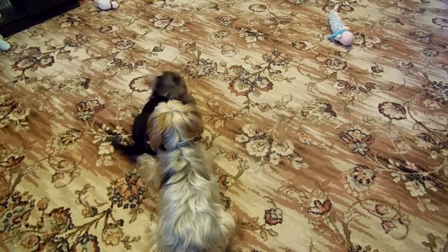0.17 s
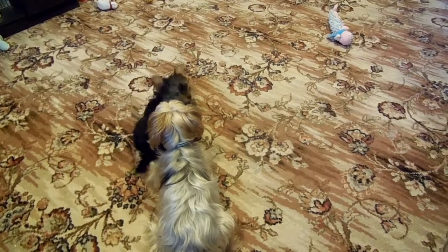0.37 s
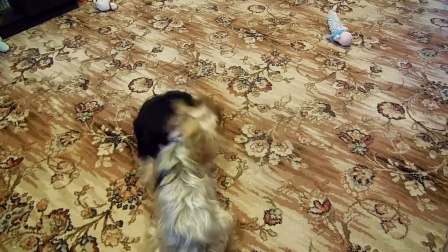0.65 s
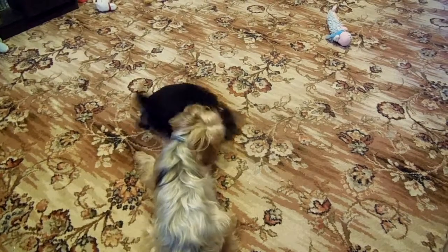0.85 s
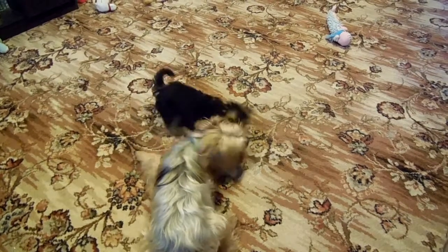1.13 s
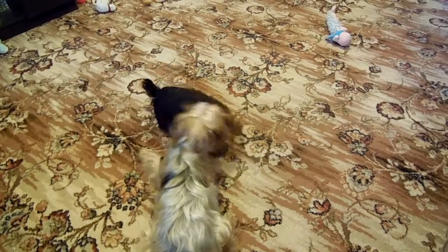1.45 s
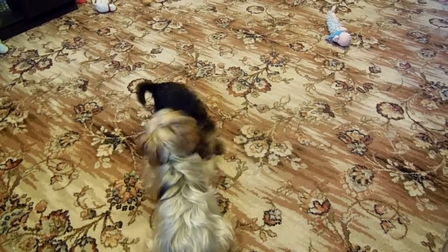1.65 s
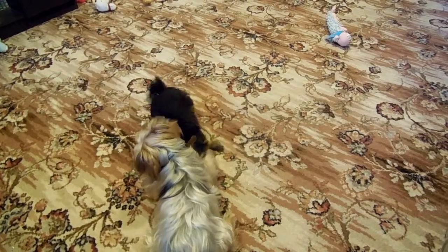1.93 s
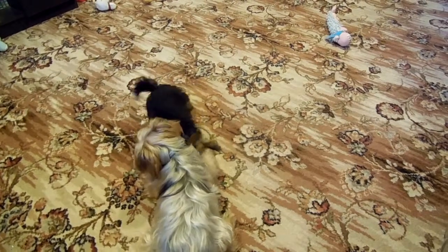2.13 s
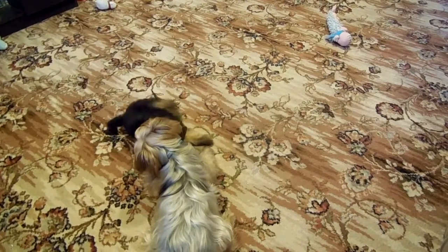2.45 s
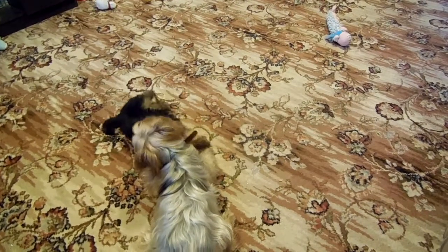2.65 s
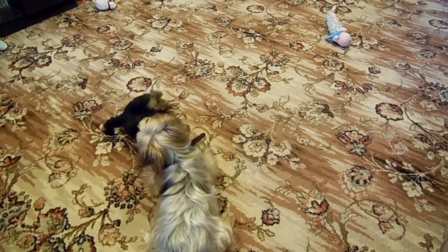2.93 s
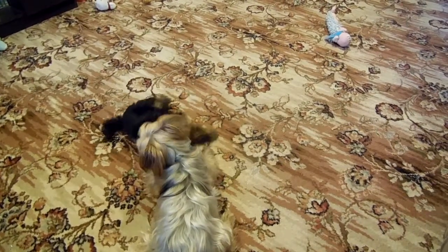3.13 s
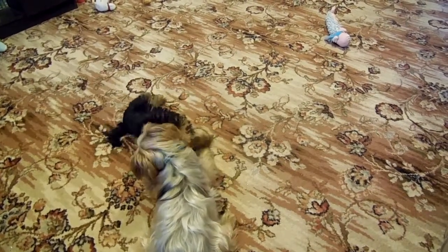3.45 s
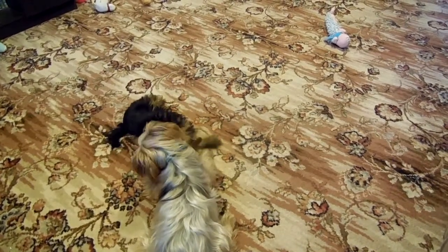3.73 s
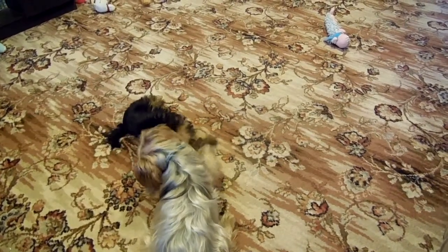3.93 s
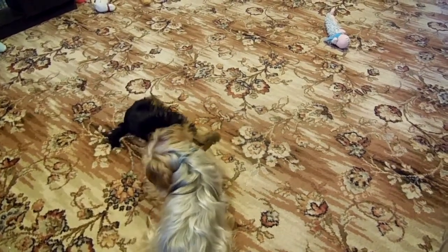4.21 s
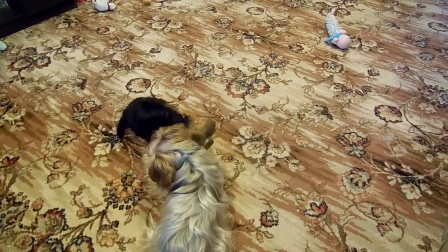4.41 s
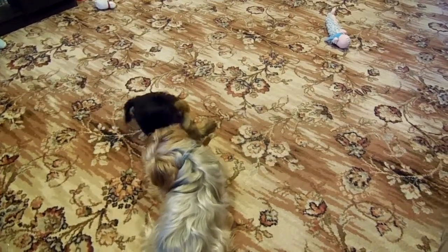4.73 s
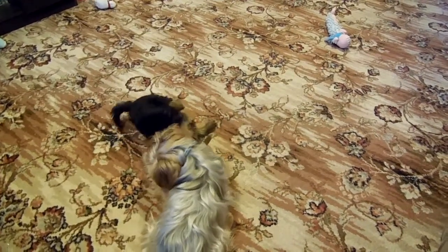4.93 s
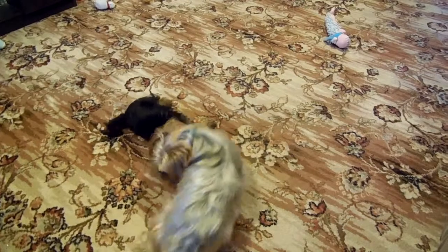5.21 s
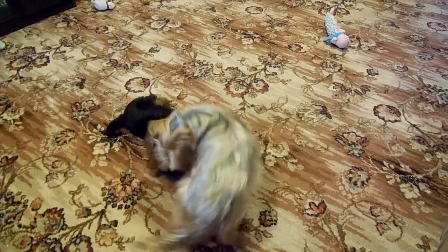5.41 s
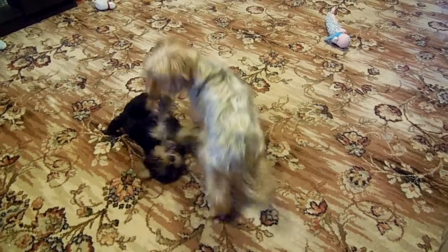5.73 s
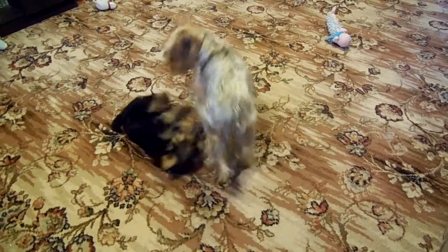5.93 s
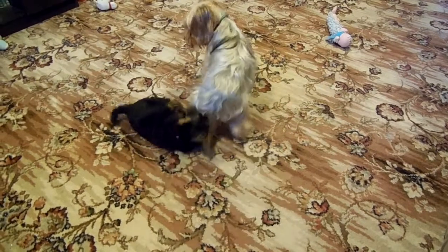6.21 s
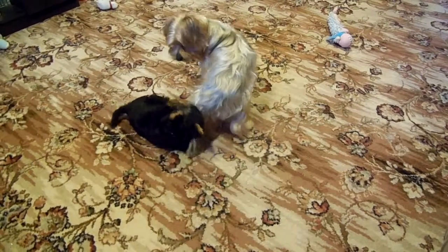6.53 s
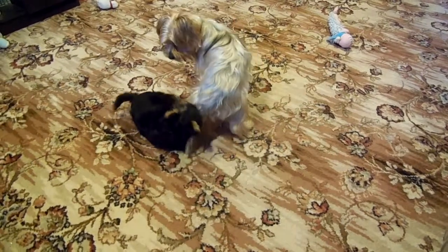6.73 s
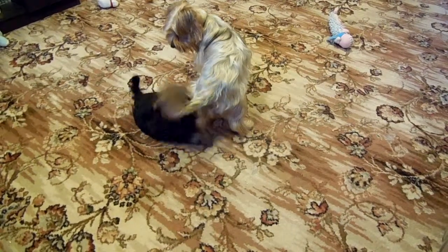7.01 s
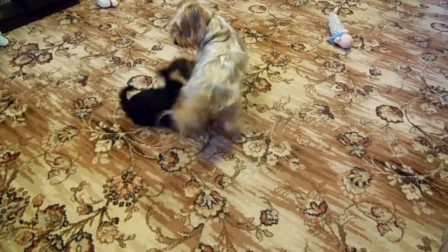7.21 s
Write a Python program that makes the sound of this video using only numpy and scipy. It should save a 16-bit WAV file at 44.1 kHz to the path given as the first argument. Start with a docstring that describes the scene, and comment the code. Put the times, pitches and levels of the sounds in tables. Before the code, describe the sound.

Two puppies scuffle softly in a quiet room, a collar tag clinking on and off amid a few claw clicks and a tiny squeak.

```python
"""Two puppies tussle on a carpet in a quiet room, a couple of metres from a stereo microphone.
Over room noise, mains hum and microphone hiss, fur rustles and a metal collar tag is struck and rattles
on its ring. Claws and teeth click at one second; at a second and a half one pup squeaks. After a lull
the tag starts again at three seconds, takes a hard blow just after four amid more clicks, then jingles
on in mostly lighter bursts. The furnished room answers with a short, dull echo."""
import sys
import numpy as np
from scipy import signal
from scipy.fft import rfft, irfft, next_fast_len
from scipy.io import wavfile
from scipy.ndimage import uniform_filter1d

SR = 44100
rng = np.random.default_rng(int(sys.argv[2]) if len(sys.argv) > 2 else 0)


def log_audio(samples):
    """Write samples as a 16-bit WAV file to the path given in sys.argv[1]."""
    # one column per channel
    frames = np.atleast_2d(samples).T
    # limit to full scale, then quantise
    limited = np.clip(frames, -1, 1)
    pcm = np.round(limited * 32767).astype(np.int16)
    wavfile.write(sys.argv[1], SR, pcm)


N = 324311
FFT = next_fast_len(N)

# Modes of the tag in five groups, by the way it is hit: main ring, clack, edge, upper rings 1 and 2.
# Each row of a group: nominal pitch in Hz, relative level in dB, nominal 60 dB decay time in seconds.
TAG_MODES = [
    [(4090, 0, 0.059), (4160, -18, 0.05), (4260, -19, 0.03)],
    [(4350, -9, 0.014), (4560, -7.5, 0.014), (4880, -7, 0.014), (5220, -12, 0.011), (5530, -20, 0.0082)],
    [(6610, 1, 0.024), (7480, -7.5, 0.027), (8740, -12, 0.02)],
    [(9995, 3, 0.085), (13400, -9, 0.045)],
    [(11000, 7, 0.059), (15250, -10, 0.07)],
]
# Blows on the tag. Each row: start in seconds, main ring level in dB, then clack, edge and upper rings
# in dB against it, freedom to ring from 0 to 1.
TAG_BLOWS = [(0.1847, -36.5, -17, -20, -13, 0.3), (0.205, -36.5, -19, -22, -25, 1),
             (0.283, -43, 3, 3, -21, 1), (0.302, -34, -14, -14, -23, 0.8), (0.3195, -33, -20, -26, -34, 1),
             (0.333, -42, -16, -24, -26, 0.3), (0.7847, -44, -15, -13, -19, 0.5),
             (0.837, -36.5, -14, -11, -11, 0.15), (0.927, -44, -13, 7, 3.5, 0.22),
             (0.945, -43.5, -10, 4, -12, 0.64), (1.024, -32, -22, -27, -40, 1),
             (1.053, -28, -28, -26, -28, 0.15), (1.071, -26, -20, -24, -28, 0.14),
             (1.0926, -37, 2, -14, -22, 1), (1.117, -27.5, -6, -8, -39, 1),
             (1.15, -23.5, -16, -34, -42, 0.42), (1.188, -36, -11, -24, -20, 1),
             (1.45, -39.5, -14, -21, -30, 0.6), (1.498, -44, -10, -13, -19, .8),
             (1.53, -39, -15, -3, -26, 0.4), (1.655, -49, 7.5, -9, -11, 0.5),
             (1.7138, -21.5, 0, -16.5, -19.5, 0.77), (1.7788, -33.5, -20, -19, -18, 0.6),
             (1.8186, -39, -13, -13, -31, 0.7), (1.871, -50.5, -1, 17.5, -3, 0.6),
             (1.883, -57, -1, 20, -1, 0.5), (1.899, -40, -2, 15, -5, 0.4), (1.92, -37, -16, -7, -27, 0.8),
             (1.939, -31.5, -5, -17, -28, 0.8), (1.985, -29.5, -14, 3, -24, 0.45),
             (2.037, -44, -4, -16, -11, 0.6), (2.0986, -39, 1, -20, -11, 0.9),
             (2.156, -42, -8, -13, -11, 0.83), (2.2266, -42, -4, -11, -7, 1),
             (3.1257, -35.5, -11, -2, -25, 0.27), (3.146, -41, -12, -16, -25, 0.4),
             (3.242, -40, -6, -17, -25, 0.4), (3.267, -45, 5, -12, -18, 0.4),
             (3.286, -39, -0.5, -13, -21, 0.4), (3.3776, -20.5, -8, -10, -25, 0.2),
             (3.434, -28, -1, -2, -20, 0.34), (3.5693, -26.5, -5, -26, -32, 1),
             (3.592, -30.5, -7, -26, -35, 0.3), (3.609, -41.5, 9.5, -12, -21, 1),
             (3.693, -32, -19, -19, -13, 0.2), (3.75, -47, 1, -5, -7, 0.7), (3.77, -44, -10, -10, -7, 0.58),
             (4.3068, -19, -15, -24, -27, 0.19), (4.3165, -33, -8, -24, -22, .15),
             (4.3217, -35, -3, -24, -24, 0.2), (4.33, -41, -6, -22, -22, .2),
             (4.872, -45.5, -15, -10, -10, 0.33), (4.924, -49, -8, -14, -17, 0.6),
             (5.058, -45, -8, -12, -8, 0.17), (5.075, -48.5, -9, 11.5, -11, 0.55),
             (5.095, -40, -9, -16, -14, 0.14), (5.13, -40, -13, -16, -13, 0.27),
             (5.234, -43, -8, -12, -24, 0.4), (5.303, -48, -10, -14, -11, 0.46),
             (5.326, -51, -12, -14, -14, .3), (5.424, -47.5, -14, -14, -16, 0.48),
             (5.5627, -26, -18, -25, -36, 0.18), (5.9844, -52, 10, -4, -2, .5),
             (6.0386, -43, 0, -8, -19, 0.6), (6.0656, -52.5, 3, 14, 8, 0.9),
             (6.098, -34, 4.5, -19, -14, 0.96), (6.229, -37, -7, -19, -29, 0.5),
             (6.2432, -34, -7, -20, -30, 0.33), (6.2903, -39.5, -5, -9, -13, 0.2),
             (6.364, -42, -13, -12, -14, 0.4), (6.383, -40, -14, -16, -14, 0.35),
             (6.437, -48, -5, -6, 2, 0.2), (6.49, -44.5, -11, -5, -14, 0.9),
             (6.5302, -45, -18, -13, -15, 0.6), (7.152, -46, -7, -15, -21, .8),
             (7.16, -37, -14, -20, -22, 0.3), (7.1817, -34.5, 0, -26, -24, 0.44),
             (7.197, -49, -6, -20, -20, .25), (7.214, -42, 1, -17, -17, 0.25),
             (7.255, -40, -4, -17, -16, 0.12), (7.285, -44, -1, -15, -22, 0.05),
             (7.312, -48, -8, -17, -20, .2)]
TOPMOST_HZ = 12000  # modes above this swell and sink with the way the tag hangs


def undb(db):
    """Turn dB into gain."""
    return np.exp(np.asarray(db) * (np.log(10) / 20))


def level(x, db):
    """Scale to an rms level."""
    return x * undb(db) / np.sqrt(np.mean(x ** 2))


def fade(t, t60):
    """Decay by 60 dB in t60 seconds."""
    return np.exp(-np.log(1000) * t / t60)


def curve(rows, rest):
    """Columns of a timed table joined by straight lines, at a rest value outside it."""
    times, *columns = np.transpose(rows)
    return np.array([np.interp(np.arange(N) / SR, times, column, rest, rest) for column in columns])


def sides(pan_db):
    """Left and right gains, pan_db being left minus right."""
    return undb(np.array([pan_db, -pan_db]).reshape(2, -1) / 2)


def add(out, start, sound):
    """Mix a short sound in at start seconds."""
    i = int(start * SR)
    out[:, i:i + sound.shape[1]] += sound[:, :N - i]


def walk(rate):
    """Random values joined by straight lines, rate new ones a second; spread near 1."""
    knots = rng.standard_normal(int(N / SR * 100) + 2)
    return 1.2 * np.interp(np.arange(N) * rate / SR, np.arange(len(knots)), knots)


def on_log_hz(table):
    """Spread rows of frequency and value over every frequency bin."""
    hz, value = np.transpose(table)
    return np.interp(np.log(np.arange(FFT // 2 + 1) * SR / FFT + 1), np.log(hz), value)


def room_tone(noise_db=-52, pan_db=-1):
    """Steady room noise and microphone hiss, alike on both sides in the bass, with wavering mains hum."""
    # Broad noise whose highest treble falls away. Each row: frequency in Hz, relative density in dB.
    spectrum = [(15, -54), (28, -7.5), (53, -11), (92, -8.5), (138, -7), (244, -3), (481, -3), (1000, -2),
                (4330, -8), (10000, -14), (13500, -21), (14200, -28), (15200, -29), (16500, -56)]
    # Likeness of the two channels. Each row: frequency in Hz, left-right correlation.
    likeness = [(25, .97), (60, 1), (125, 0.37), (250, 0.57), (500, 0.11), (16000, 0.093)]
    # Tones of the hum. Each row: frequency in Hz, level in dB.
    hum_tones = [(50, -74), (200, -78), (250.5, -69.5), (301, -78.5), (390, -76.5), (732, -76)]
    alike = np.clip(on_log_hz(likeness), 0, 1)
    coloured = rfft(rng.standard_normal((2, FFT))) * undb(on_log_hz(spectrum))
    mid, side = coloured * np.sqrt([1 + alike, 1 - alike])
    noise = level(irfft(np.array([mid + side, mid - side]), FFT)[:, :N], noise_db)
    t = np.arange(N) / SR
    hum = sum(np.sqrt(2) * undb(db + 0.85 * walk(8)) * np.sin(2 * np.pi * hz * t + 0.47 * walk(8.8))
              for hz, db in hum_tones)
    return (noise + hum) * sides(pan_db)


def room_echo(near, t60=0.16, echo_db=-4.5, carpet_hz=7000, pan_db=-3):
    """Carpet and furniture leave a short, dense, dull tail, different on each side of the microphone."""
    t = np.arange(SR // 2) / SR
    tail = rng.standard_normal((2, len(t))) * fade(t, t60) * (t > .0015)
    tail = signal.lfilter(*signal.butter(2, carpet_hz, fs=SR), tail)
    tail = tail * undb(echo_db) / np.sqrt(np.sum(tail ** 2, axis=1, keepdims=True))
    return signal.oaconvolve(near.mean(axis=0, keepdims=True), tail, axes=1)[:, :N] * sides(pan_db)


def fur_rustle(gain_db=4):
    """Fur and paws brush the carpet: grainy noise that follows the movement."""
    # Strength of the brushing. Each row: time in seconds, relative level in dB.
    movement = [(0.0, -62.5), (0.3, -54), (0.61, -67.5), (0.92, -54.5), (1.3, -56), (1.42, -56), (1.9, -55),
                (2.03, -51), (2.11, -56.5), (3.03, -65), (3.46, -54.5), (3.62, -57.5), (4.05, -66.5),
                (4.3, -61), (5.94, -58.5), (6.04, -52), (6.2, -60.5), (6.37, -51.5), (6.51, -61),
                (7.04, -64.5), (7.25, -56), (7.35, -70)]
    # Broad soft hiss of the brushing; the top rows are a treble cutoff near 14 kHz, not the fur.
    # Each row: frequency in Hz, relative density in dB.
    spectrum = [(100, -47), (300, -4.5), (1000, -5), (2500, -3.5), (6000, -10.5), (13500, -12),
                (14300, -56), (16500, -42)]
    grains = rng.standard_normal((2, N)) * undb(walk(60) + .5 * walk(38) + curve(movement, -89))
    bin_gains = level(undb(on_log_hz(spectrum)), 0)
    return undb(gain_db) * irfft(rfft(grains, FFT) * bin_gains, FFT)[:, :N]


def pup_squeak(creak_hz=192.5, roughness=1.25, mouth_hz=2480, mouth_db=-3, pan_db=-2):
    """Creaky pulses in a rising throat resonance and a steady mouth one merge into a thin whistle."""
    # Course of the squeak. Each row: time in seconds, throat resonance in Hz, level in dB,
    # share of creaky pulses from 0 to 1.
    contour = [(1.445, 2345, -62, .4), (1.455, 2500, -47, .4), (1.462, 2640, -41, .9),
               (1.474, 2820, -41, .7), (1.48, 2910, -39, .3), (1.489, 2910, -45, .4),
               (1.499, 2910, -42, .2), (1.509, 2910, -48, .3), (1.514, 2900, -62, .2),
               (1.521, 2900, -52, .2), (1.53, 2915, -57, .2), (1.56, 2920, -57, .2), (1.595, 2920, -66, .1)]
    hz, db, creak = curve(contour, -200)
    creak = np.clip(creak, 0, 1)
    pulse_hz = creak_hz * (1 + 0.13 * walk(90))
    pulses = 2.8 * np.sin(np.pi * np.cumsum(pulse_hz) / SR) ** 4
    hoarse = 1 + roughness * uniform_filter1d(rng.standard_normal((2, N)), size=40)
    throat = (1 - creak + creak * pulses) * np.sin(2 * np.pi * np.cumsum(hz) / SR)
    mouth = undb(mouth_db) * creak * (.5 + .5 * pulses) * np.sin(2 * np.pi * mouth_hz * np.arange(N) / SR)
    return np.sqrt(2) * undb(db) * (hoarse[0] * throat + hoarse[1] * mouth) * sides(pan_db)


def claws_and_teeth(contact_s=0.00015, tick_db=9.5, knock_hz=800, scuff_db=-19):
    """Hard contacts give dry ticks of a cycle or two over a dull knock and a short scuff."""
    # Clicks of claws and teeth. Each row: start in seconds, level in dB, pitch in Hz,
    # left minus right in dB, relative level of the knock in dB.
    clicks = [(0.988, -32, 1810, -3.5, -20), (1.005, -35, 2100, -3, -4.5), (1.39, -35, 2600, -2.5, -30),
              (4.158, -40, 3530, 0, -4), (4.1787, -43.5, 2640, -1, 4.5), (4.181, -40, 1580, -5, -22),
              (4.558, -39, 2160, -10, -7), (4.567, -59, 2200, -5, -8), (4.593, -57, 1200, -3, 10),
              (4.61, -60, 1200, -1, 8), (5.897, -43.5, 3300, -1.5, -10), (5.977, -48, 2540, 0, -10)]
    out, t = np.zeros((2, N)), np.arange(SR // 20) / SR
    envelope = (1 - np.exp(-t / contact_s)) * fade(t, t60=0.0032)
    knock = np.sin(2 * np.pi * knock_hz * t) * fade(t, t60=0.012)
    soft_noise = 2 * uniform_filter1d(rng.standard_normal((len(clicks), len(t))), size=5)
    scuffs = soft_noise * undb(scuff_db) * fade(t, t60=0.1)
    scuffs = signal.lfilter(*signal.butter(2, 250, "high", fs=SR), scuffs)
    for (start, db, hz, pan_db, knock_db), scuff in zip(clicks, scuffs):
        tick = undb(tick_db) * np.sin(2 * np.pi * hz * t) * envelope
        add(out, start, undb(db) * (tick + undb(knock_db) * knock + scuff) * sides(pan_db))
    return out


def tag_hang():
    """Lying against collar and fur, the tag bends its main pitch and shifts its upper modes' levels."""
    # How the tag hangs. Each row: time in seconds, main ring pitch in Hz,
    # upper ring 1 minus upper ring 2 in dB, lift of the topmost modes in dB.
    hang = [(.1, 4150, -3, -8), (.3, 4150, 2, -8), (.75, 4130, -3, -2), (.95, 4140, 0, 8),
            (1.15, 4140, -8, 5), (1.19, 4145, -6, 0), (1.22, 4150, 4, -1), (1.35, 4150, -3, -6),
            (1.72, 4150, -4, -1), (1.8, 4150, 0, 7), (1.95, 4160, 0, 9), (2.05, 4160, -3, 0),
            (2.25, 4160, -3, -4), (3.15, 4140, 0, -4), (3.4, 4145, -3, 0), (3.6, 4134, 2, -2),
            (3.66, 4100, -2, -4), (3.78, 4200, -3, -5), (4.31, 4200, 0, -3), (4.36, 4080, 0, -3),
            (4.88, 4170, 0, 0), (4.96, 4230, 0, 0), (5.12, 4275, 0, 3), (5.21, 4165, 0, -3),
            (5.32, 4185, 0, -3), (5.45, 4140, 0, -3), (6.1, 4165, -3, 0), (6.25, 4123, 0, -3),
            (6.35, 4180, 0, 0), (6.38, 4245, 0, 2), (6.45, 4280, 0, 0), (6.49, 4155, 0, -3),
            (7.14, 4180, 0, -3), (7.18, 4230, 0, -3), (7.22, 4330, 0, -3), (7.26, 4290, 0, -3),
            (7.31, 4420, 0, -3)]
    held_at_ends = [(0, *hang[0][1:]), *hang, (N / SR, *hang[-1][1:])]
    hz, balance_db, top_db = curve(held_at_ends, 0)
    return hz / TAG_MODES[0][0][0], balance_db / 2, top_db


def collar_shaking(rise_share=0.36, span_db=44, chatter_db=-28.5, chatter_t60=0.29):
    """Force on main ring, clack and both upper rings: swells of the collar, chatter after each blow."""
    # Shakes of the collar. Each row: time of the peak in seconds, length in seconds,
    # main ring drive in dB, then clack, upper ring 1 and upper ring 2 in dB against it.
    shakes = [(0.203, 0.41, -36, -8.5, -16, -13.5), (0.303, 0.19, -37, -17, -28, -34),
              (0.397, 0.43, -50.5, -6, -23, -18), (0.79, 0.57, -48.5, -8, -16, -15),
              (0.955, 0.17, -41.5, -5, -18, -27), (1.042, 0.24, -39.5, -9, -31, -31),
              (1.136, 0.32, -38, -6, -13, -19.5), (1.215, 0.39, -35, -16, -14, -20),
              (1.225, 0.16, -48, -10, -2, -13), (1.513, 0.78, -52, -0.5, -8, -11),
              (1.646, 0.084, -63, 17.5, -3, -3), (1.838, 0.18, -52, -2, -15, -10),
              (1.954, 0.37, -34.5, -10.5, -13, -20), (2.022, 0.16, -50, -12, -24, -14),
              (2.16, 0.15, -59, -3, -13, -15), (2.236, 0.075, -40, -14, -21, -22),
              (3.134, 0.11, -45.5, -1.5, -11, -19), (3.306, 0.48, -55.5, 3, -15, -1.5),
              (3.492, .2, -50, -17, -24, -28), (3.617, 0.16, -38, -25, -9, -40),
              (3.697, 0.1, -43, -1.5, -20, -4), (4.328, 0.23, -52, 1, -13, -17),
              (4.857, 0.22, -59, -2, -10, -5), (4.94, 0.12, -59, -6, -16, -12),
              (5.307, 0.15, -64, -6, -14, -13), (5.109, 0.16, -57, -2, -20, -14),
              (5.245, 0.11, -51, -10, -25, -3), (5.46, 0.19, -59, -18, -18, -15),
              (5.587, 0.24, -44, -6.5, -34, -24), (6.01, .25, -61, 10, -7, -14),
              (6.082, 0.19, -60, 13, -9, -6), (6.375, 0.26, -49, -0.5, -8, -13),
              (6.49, 0.18, -59, -14, -13, -12), (7.16, 0.093, -47.5, 1, -25, -14),
              (7.2, 0.16, -61, 9.5, -13, -7), (7.28, 0.13, -63.5, 9, -10, -14)]
    force = np.zeros((4, N))
    for peak_s, length, main_db, *relative_db in shakes:
        rise = rise_share * length
        t = np.arange(int(length * SR)) / SR
        swell_db = np.interp(t, [0, rise, length], [-span_db, 0, -span_db])
        add(force, peak_s - rise, undb(main_db + np.array([0, *relative_db])[:, None] + swell_db))
    chatter = undb(chatter_db) * fade(np.arange(SR // 5) / SR, chatter_t60)
    for start, main_db, clack_db, _, upper_db, _ in TAG_BLOWS:
        add(force, start, undb(main_db + np.array([0, clack_db, upper_db, upper_db])[:, None]) * chatter)
    return force


def ring_mode(drive, hz, t60, order=1):
    """One mode, free to glide, driven by a force; order 2 has steeper skirts."""
    pole = np.exp(-np.log(1000) * order / (t60 * SR))
    carrier = np.exp(2j * np.pi * np.cumsum(np.broadcast_to(hz, N)) / SR)
    envelope = drive / carrier * 2 * np.sqrt(1 - pole)
    for stage in range(order):
        envelope = signal.lfilter([1 - pole if stage else 1], [1, -pole], envelope)
    return (envelope * carrier).real


def tag_rattle(taps_per_s=900, broadside_db=-5, edge_db=-14, upper_db=-6, ring_time_share=0.8):
    """Dense, uneven little taps between the tag and the ring it hangs on keep its modes sounding."""
    contacts = rng.random(N) < taps_per_s / SR
    taps = contacts * undb(-rng.exponential(size=N)) * rng.standard_normal(N)
    # The tag swings against fur and comes free again, so the rattle breaks up.
    force = collar_shaking() * level(taps * undb(2.6 * walk(35)), 0)
    # Broadside taps last a few samples, so they carry little treble.
    main, clack = undb(broadside_db) * uniform_filter1d(force[:2], size=4) * 2
    bend, lean_db, top_db = tag_hang()
    main_ring = sum(undb(db) * ring_mode(main, hz * bend, t60 * ring_time_share, order=2)
                    for hz, db, t60 in TAG_MODES[0])
    uppers = undb(upper_db + np.array([lean_db, -lean_db])) * force[2:]
    drives = [clack, clack * undb(edge_db), *uppers]
    return main_ring + sum(undb(db) * ring_mode(drive * undb(top_db * (hz > TOPMOST_HZ)), hz, t60)
                           for drive, modes in zip(drives, TAG_MODES[1:]) for hz, db, t60 in modes)


def tag_blows(contact_s=0.00084, crack_hz=4900, crack_db=3, crack_s=0.00031, tick_db=-6, fur_catch=1.7):
    """Each blow cracks and sets all the tag's modes going; fur against the metal shortens the ring."""
    # Spread of pitch with the point of contact: one fraction for each group of modes.
    pitch_spread = [0.0027, 0.04, 0.004, 0.001, 0.002]
    out, t = np.zeros((1, N)), np.arange(SR // 10) / SR
    hz, db, t60 = np.concatenate(TAG_MODES).T[:, :, None]
    hang = np.array(tag_hang())
    group = np.repeat(np.arange(len(TAG_MODES)), [len(modes) for modes in TAG_MODES])[:, None]
    decay_power = np.where(group == 0, fur_catch, 1)  # the main ring holds at first, then fur catches it
    attack = 1 - np.exp(-t / contact_s)
    chance = rng.standard_normal((len(TAG_BLOWS), len(hz) + 1, 1))
    crack = undb(crack_db) * np.sin(2 * np.pi * crack_hz * t) * t / crack_s * np.exp(1 - t / crack_s)
    bright_noise = uniform_filter1d(rng.standard_normal((len(TAG_BLOWS), len(t))), size=2)
    ticks = undb(tick_db) * bright_noise * fade(t, t60=0.0081)
    for blow, (turn, *detune), tick in zip(TAG_BLOWS, chance, ticks):
        start, main_db, clack_db, edge_db, upper_db, freedom = blow
        bend, lean_db, top_db = hang[:, int(start * SR)]
        favour_db = lean_db - 0.5 * turn[0]  # each blow favours one upper ring, partly by chance
        group_db = np.array([0, clack_db, edge_db, upper_db + favour_db, upper_db - favour_db])
        gain = undb(db + top_db * (hz > TOPMOST_HZ) + group_db[group])
        pitch = hz * np.where(group == 0, bend, 1) * (1 + np.array(pitch_spread)[group] * detune)
        age = t / (t60 * max(freedom, .05))
        modes = gain * np.sin(2 * np.pi * pitch * t) * fade(age ** decay_power, 0.86)
        sound = attack * modes.sum(axis=0) + undb(clack_db) * crack + undb(edge_db) * tick
        add(out, start, undb(main_db) * sound[None])
    return out


def scene():
    """The pups a couple of metres from the microphone, their echo and the quiet room around them."""
    # Where the tag hangs as the pup turns. Each row: time in seconds, left minus right in dB.
    facing = [(0.1, 1), (0.32, -13), (0.56, -7), (1.32, -8), (1.44, -2), (1.52, -8.5), (3.03, 0),
              (3.11, -7), (3.91, -4.5), (6.38, -6), (6.66, -2), (7.3, -4)]
    # A small plate sends out little below its first mode.
    plate = signal.butter(10, 3980, "high", fs=SR, output="sos")
    tag = signal.sosfilt(plate, tag_blows() + tag_rattle()) * sides(curve(facing, -1)[0])
    near = tag + claws_and_teeth() + pup_squeak()
    return near + room_echo(near) + fur_rustle() + room_tone()


def record(dry, top_hz=16000):
    """The recorder cuts off the highest treble steeply."""
    return signal.sosfilt(signal.ellip(8, .2, 60, top_hz, fs=SR, output="sos"), dry)


dry = scene()
out = record(dry)
log_audio(out)
```